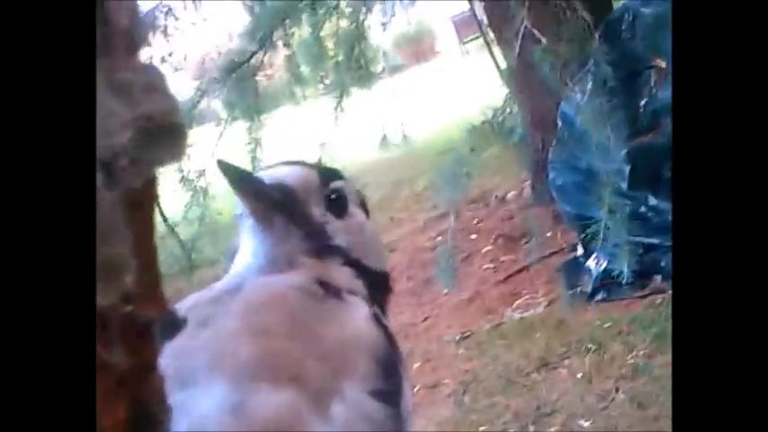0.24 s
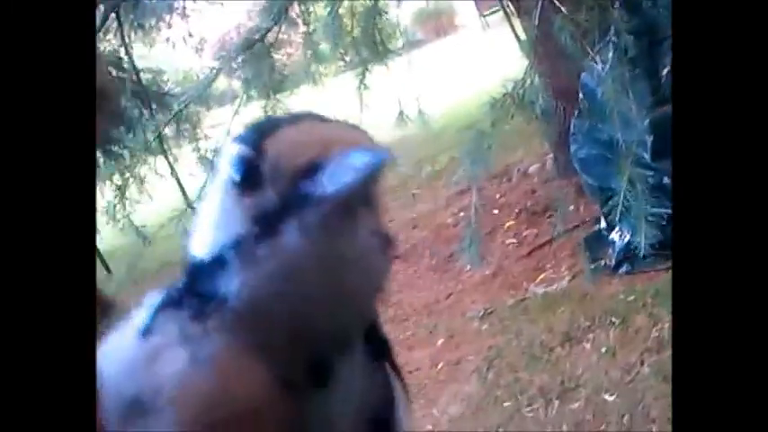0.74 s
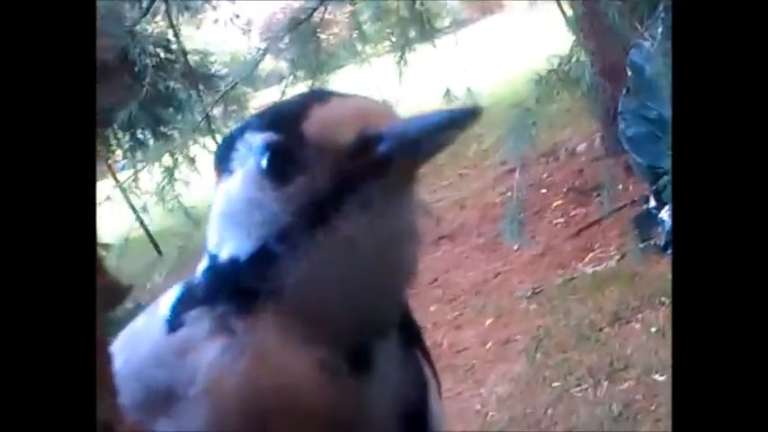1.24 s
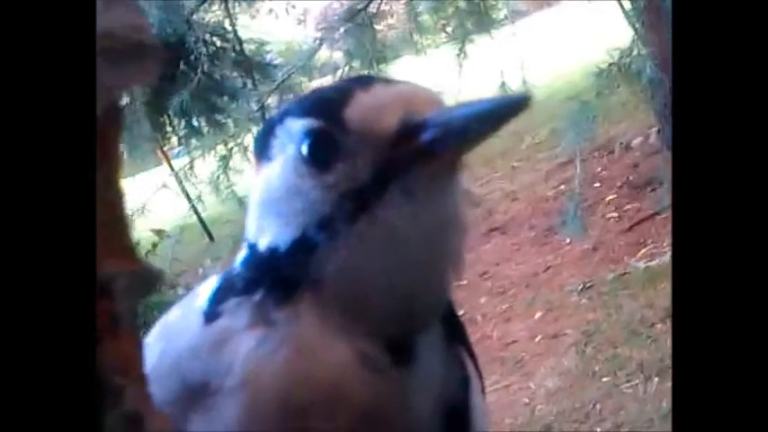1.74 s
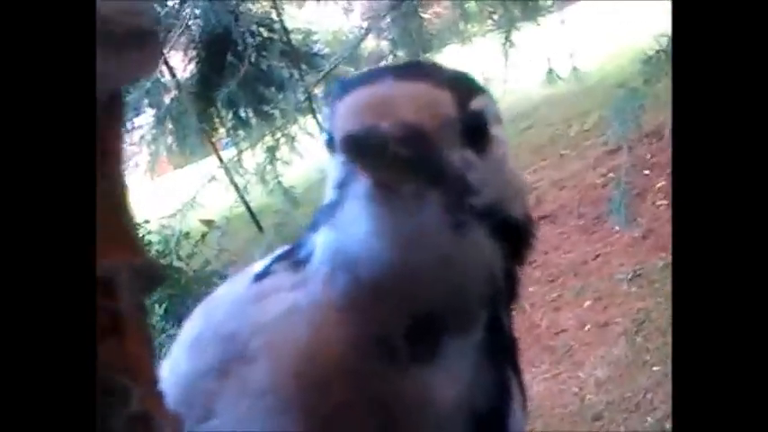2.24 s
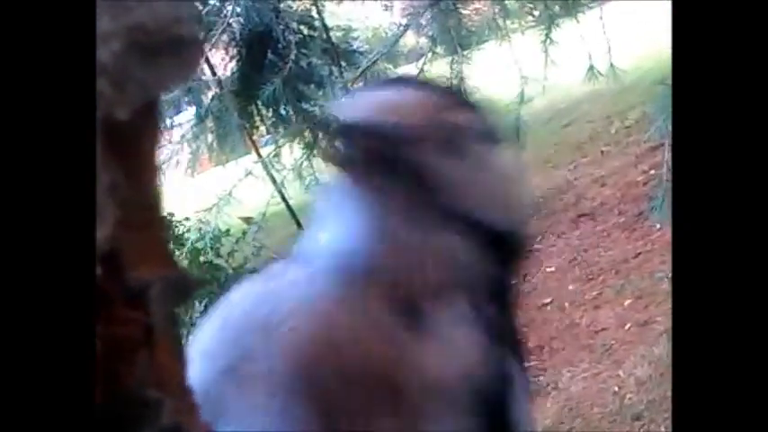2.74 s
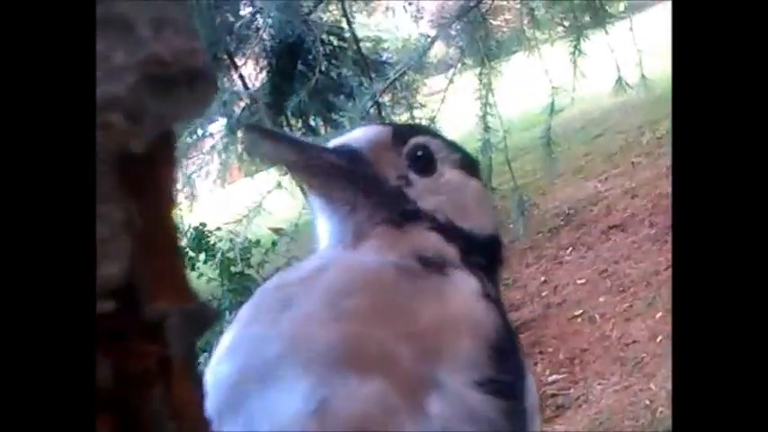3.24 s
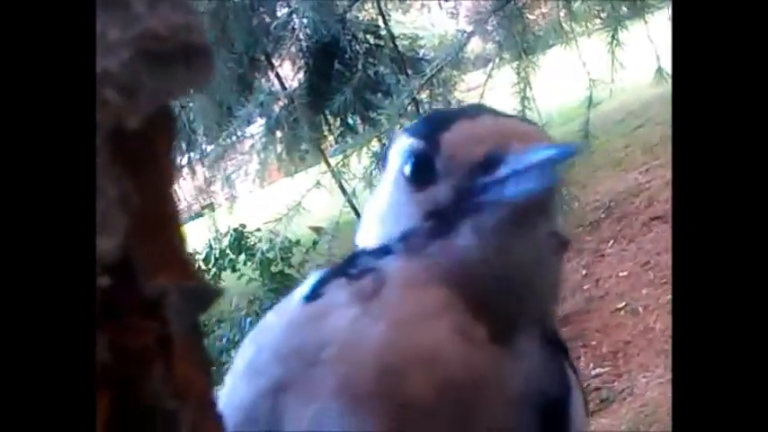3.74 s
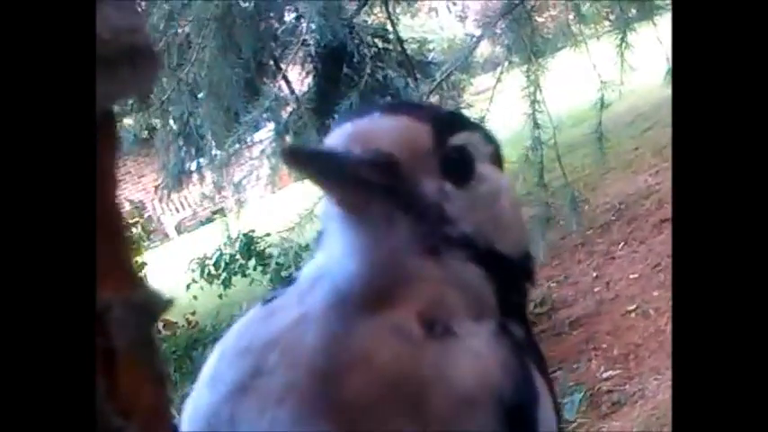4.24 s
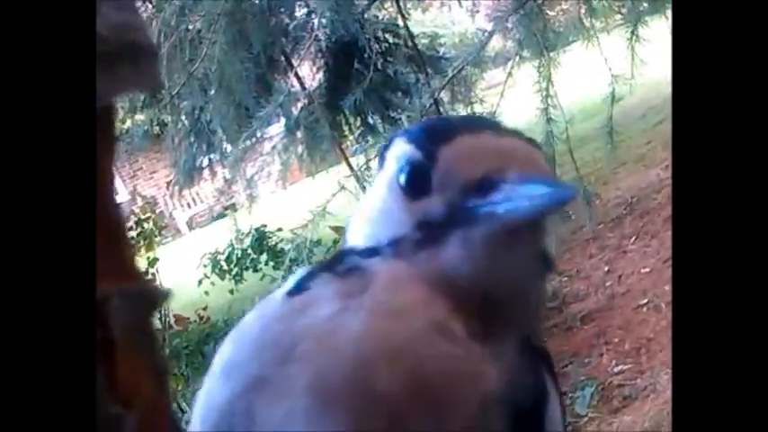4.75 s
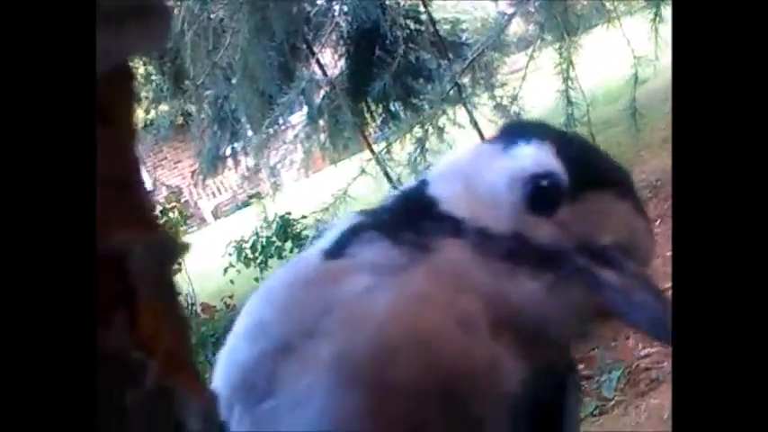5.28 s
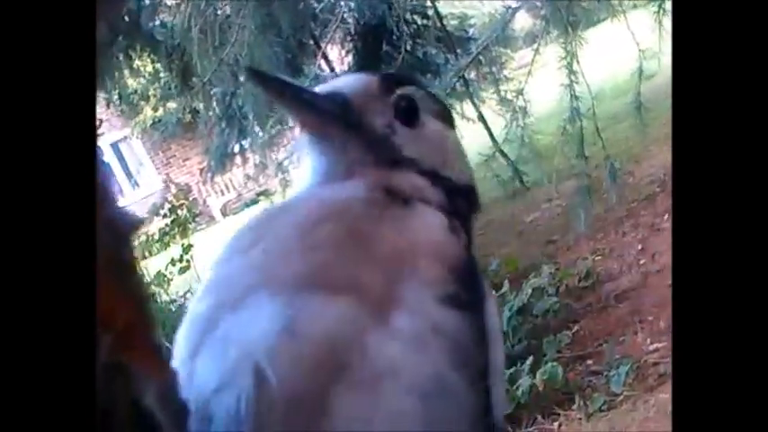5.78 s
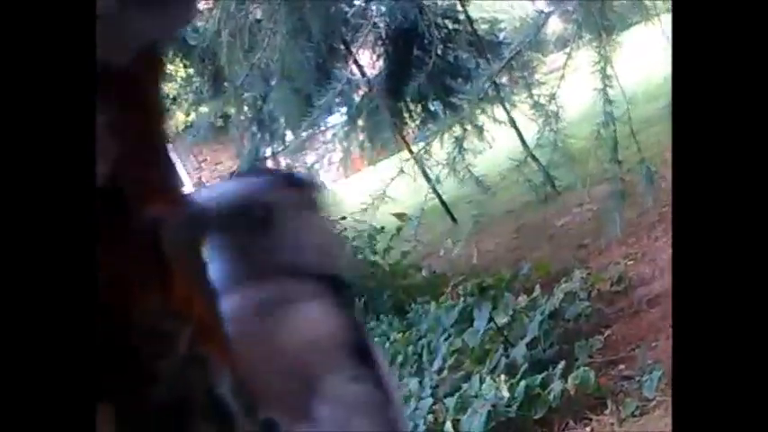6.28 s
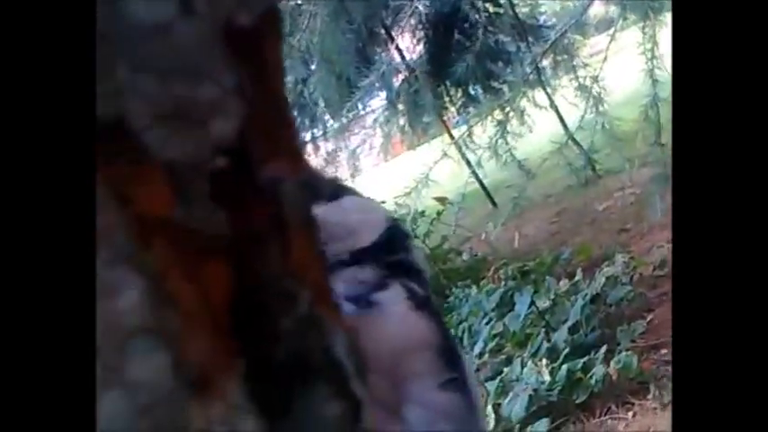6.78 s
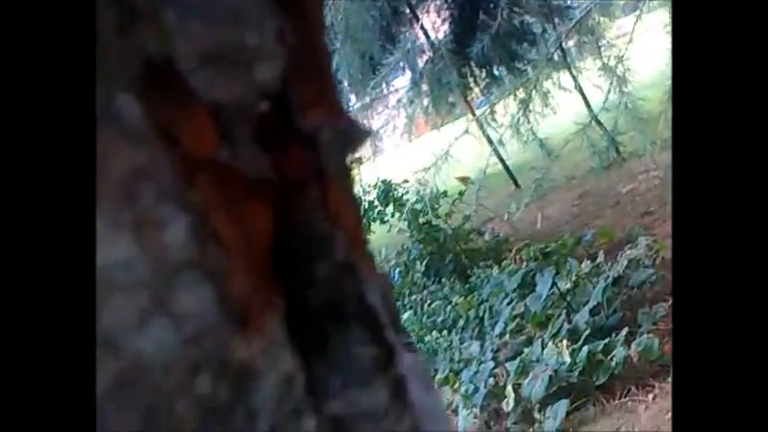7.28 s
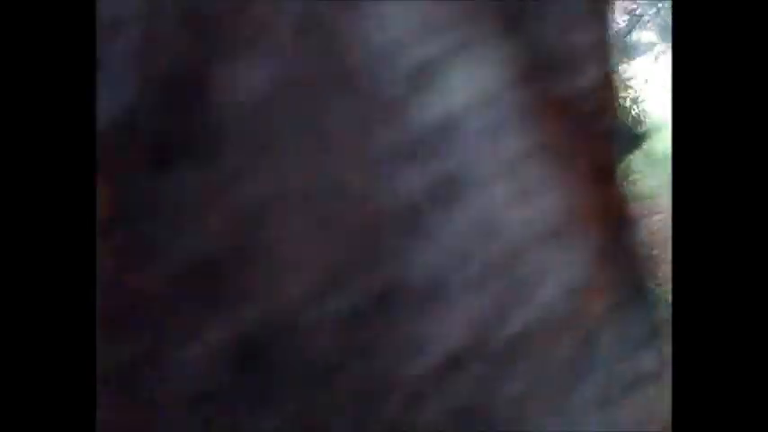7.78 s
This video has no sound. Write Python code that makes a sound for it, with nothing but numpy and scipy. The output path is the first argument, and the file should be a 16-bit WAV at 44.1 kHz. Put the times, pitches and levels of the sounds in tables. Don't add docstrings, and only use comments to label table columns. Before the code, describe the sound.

A woodpecker calls extremely close to a small microphone beside a tree trunk. Each call is a sharp, clipped chip of about a twentieth of a second: a low start jumps to a whistled arch near 2.4 kHz and drops back, with a rough, squeaky edge. Calls fall at about 0.4, 1.3, 2.1, 2.7, 3.2, 3.8, 4.4, 5.0, 5.5, 5.9, 6.4, 6.8, 7.3 and 7.8 s, brightest around 3.8-5.5 s and somewhat weaker toward the end. Dry claw ticks on bark begin at 5.9 s, cluster at 6.25-6.45 s, and return once at 7.9 s. Behind, road traffic is faint at first, swells strongly from 1 to 3.4 s, then stays steady: rumble, tyre roar, wavering engine hums, a heavier vehicle around 4.5 s and a brief hiss lift at 4.7 s. Outdoors, almost no echo, slightly grainy, rolled-off treble.

```python
import sys
import numpy as np
from scipy import signal
from scipy.fft import rfft, irfft
from scipy.io import wavfile
from scipy.ndimage import uniform_filter1d

SR = 44100
rng = np.random.default_rng(int(sys.argv[2]) if len(sys.argv) > 2 else 0)


def makeup_ratio(level_db):
    decades = np.asarray(level_db, float) / 20
    return 10 ** decades


def wrap_up_sound(samples):
    columns = np.atleast_2d(samples).T
    tamed = np.clip(columns, -1, 1)
    steps = np.round(tamed * 32767).astype(np.int16)
    wavfile.write(sys.argv[1], SR, steps)


N = 353682
CALL_START_MS, CALL_END_MS = -22.5, 33


def evened(x):
    return x / np.sqrt(np.mean(x ** 2) + 1e-20)


def read(points, hz):
    point_hz, value = np.transpose(points)
    return np.interp(np.log(hz + 1), np.log(point_hz + 1), value)


def add(mix, start_s, sound):
    part = mix[max(round(start_s * SR), 0):][:len(sound)]
    part += sound[:len(part)]


def step(t, at, span):
    return 0.5 + 0.5 * np.tanh((t - at) / (2 * span))


def bump(t, at, span):
    return np.exp(-((t - at) / span) ** 2)


def wander(length, hz, count=N):
    lowpass = signal.butter(N=2, Wn=hz, fs=SR, output="sos")
    slow = signal.sosfilt(lowpass, rng.standard_normal(count))
    return evened(slow[::-1][:length])


def noise(spectrum, patchy_db, size=1024):
    frames, hz = 4 * N // size + 8, np.fft.rfftfreq(size, 1 / SR)
    real, imaginary, patches = rng.standard_normal((frames, len(hz), 3)).T
    patches = uniform_filter1d(patches, size=10, axis=0)
    patches = evened(uniform_filter1d(patches, size=12, axis=1))
    z = (real + 1j * imaginary) * makeup_ratio(read(spectrum, hz)[:, None] + patchy_db * patches)
    return evened(signal.istft(z, nperseg=size, noverlap=3 * size // 4)[1][:N])


def pitch_share(t):
    rising = 0.32 + 0.012 * (t - CALL_START_MS)
    falling = 0.3 + 0.012 * (CALL_END_MS - t)
    low = np.where(t < 0, rising, falling)
    crown = 1 - ((t + 0.95) / 33) ** 2
    high = step(t, -9.5, 1.15) - step(t, 12.9, 1.05)
    return low + high * (crown - low)


def call_effort(t):
    attack_db = -31 * np.exp((CALL_START_MS - t) / 1.7)
    release_db = -1.5 * np.maximum(t - 18.2, 0)
    swell_db = -0.05 * np.minimum(t + 9.5, 0)
    catch_db = -2.5 * bump(t, -7.5, 0.92) + 1.5 * bump(t, 11.54, 0.92)
    return attack_db + release_db + swell_db + catch_db


def beak_opening(t):
    return step(t, -7.5, 0.42) - step(t, 11.54, 0.58)


def harshness(t):
    return -9 + 7.5 * bump(t, -9.5, 4.5) + 14 * bump(t, 12.9, 2.3)


SHUT_BEAK = [-3, -14.5, -18.5, -18.5, -20, -24, -23.5, -27, -27, -29.5, -35.5, -22]
# centre_hz, width_hz, gain_db
THROAT = [(1220, 57, -10.5), (2020, 150, -9.5), (3550, 350, 2), (4150, 190, -8.5), (6500, 670, 3.5),
          (9350, 1900, -2.5)]
# start_s, end_s
HEAD_AWAY = [(3.1, 3.4), (5.8, 6.6)]


def call(row, jitter=0.018, breath_db=-31):
    centre_s, top_hz, level_db, second_db, third_db = row
    t = np.arange(CALL_START_MS, CALL_END_MS, 1000 / SR)
    beak, harsh_db = beak_opening(t), harshness(t)
    unsteady = jitter * (1.1 - beak) * wander(len(t), 860, count=6000)
    hz = top_hz * pitch_share(t) * (1 + unsteady)
    turns = np.cumsum(hz) / SR
    open_beak = [0, second_db, third_db] + [third_db - 32 * k for k in range(1, 10)]
    flank_db = 0.5 - 0.57 * centre_s
    facing_db = 0.31 * (second_db + third_db + 25) / 2
    dull_db = -0.6 * (second_db + 8.5)
    shade_db = -18 * any(start < centre_s < end for start, end in HEAD_AWAY)
    voice = np.zeros(len(t))
    for k in range(1, 13):
        if k == 1:
            tilt_db = flank_db
        else:
            tilt_db = harsh_db + dull_db + (facing_db - dull_db) * step(k * hz, 3700, 200)
        shut_db = SHUT_BEAK[k - 1] + tilt_db
        throat_db = sum(db * bump(k * hz, centre_hz, width_hz) for centre_hz, width_hz, db in THROAT)
        throat_db = throat_db + shade_db * step(k * hz, 7760, 150)
        gain = makeup_ratio(beak * open_beak[k - 1] + (1 - beak) * shut_db + throat_db) * (k * hz < 14000)
        voice += gain * np.sqrt(2) * np.sin(2 * np.pi * (k * turns + rng.random()))
    air = np.diff(rng.standard_normal(6000))[:len(t)]
    breath = air * makeup_ratio(breath_db + harsh_db + facing_db + shade_db / 2) * (1.15 - beak)
    shimmer_db = 1.9 * (1 - beak) * wander(len(t), 200, count=6000)
    loudness = makeup_ratio(level_db + call_effort(t) + shimmer_db) * signal.windows.tukey(len(t), 0.05)
    return centre_s + CALL_START_MS / 1000, loudness * (voice + breath)


# centre_s, top_pitch_hz, level_db, second_overtone_db, third_overtone_db
CALLS = [(0.416, 2427, -18.5, -15, -24.5), (1.262, 2347, -17, -11, -19), (2.0606, 2404, -15, -9.5, -20),
         (2.727, 2365, -16, -11.5, -21), (3.249, 2464, -18, -11, -25), (3.757, 2470, -15, -2.5, -13),
         (4.4335, 2475, -14.5, -9.5, -18), (4.967, 2455, -15.5, -2, -10),
         (5.5221, 2350, -15.5, -4.5, -14.5), (5.922, 2483, -16.5, -8.5, -13.5),
         (6.4416, 2448, -20.5, -8.5, -13.5), (6.8486, 2563, -18, -5, -11), (7.3234, 2548, -19, -6.5, -11.5),
         (7.833, 2477, -22, -8.5, -12.5)]


def woodpecker():
    calls = np.zeros(N)
    for row in CALLS:
        add(calls, *call(row))
    t = np.arange(6000) / SR
    echoes = rng.choice([-1., 1.], len(t)) * (rng.random(len(t)) < 0.05)
    scatter = echoes * makeup_ratio(-60 * t / 0.077) * (t > 0.0015)
    scatter = scatter / np.linalg.norm(scatter)
    return calls + makeup_ratio(-15.5) * signal.oaconvolve(calls, scatter)[:N]


# start_s, peak_db, centre_hz
CLAW_TICKS = [(5.912, -28, 9240), (6.002, -37.5, 6800), (6.04, -40.5, 6500), (6.253, -45, 6960),
              (6.2616, -29.5, 6750), (6.2623, -34, 4220), (6.272, -42, 7500), (6.283, -52, 6950),
              (6.305, -42, 9100), (6.325, -26, 10430), (6.327, -35, 6600), (6.345, -27, 9100),
              (6.347, -50, 6500), (6.376, -29.5, 10100), (6.43, -38, 9900), (7.9143, -27.5, 7950)]


def claws():
    out, t = np.zeros(N), np.arange(900) / SR
    for start_s, peak_db, centre_hz in CLAW_TICKS:
        decay = makeup_ratio(-60 * t / 0.0022) + makeup_ratio(-15 - 60 * t / 0.047)
        scratch = rng.standard_normal(len(t)) * decay
        edges_hz = [0.84 * centre_hz, 1.18 * centre_hz]
        band = signal.butter(N=3, Wn=edges_hz, btype="band", fs=SR, output="sos")
        tick = signal.sosfilt(band, scratch)
        add(out, start_s, makeup_ratio(peak_db) * tick / abs(tick).max())
    return out


# time_s, level_db
NEARNESS = [(0.0, -39.5), (0.91, -39), (2.75, -30.5), (2.86, -29.5), (3.15, -28.5), (3.39, -27),
            (3.55, -28), (4.42, -28), (4.71, -28), (5.23, -28), (5.5, -27.5), (5.87, -28), (7.24, -27),
            (7.64, -26.5), (8.02, -28)]
# frequency_hz, level_db (per Hz)
RUMBLE_SPECTRUM = [(10, -32), (18, -8.5), (30, -2), (45, 2.5), (97, -2.5), (124, -5), (150, -14.5),
                   (220, -18.5), (300, -46)]
# frequency_hz, level_db (per Hz)
BODY_SPECTRUM = [(76, -32.5), (130, -4.5), (200, -8.5), (306, -9), (455, -5.5), (560, -7.5), (680, -15),
                 (1000, -82.5)]
# frequency_hz, level_db (per Hz)
ROAR_SPECTRUM = [(330, -41.5), (560, -14), (614, -8), (773, -2), (967, 0.5), (1230, -5), (1310, -7.5),
                 (2700, -26.5), (3510, -57.5), (5940, -120)]
# frequency_hz, level_db (per Hz)
HISS_SPECTRUM = [(2200, -25.5), (2700, -4), (3050, 0.5), (3500, -2.5), (4410, -5), (5300, -10),
                 (6500, -16.5), (11000, -39)]
# time_s, lift_db
CLOSE_CARS = [(3.4, 2.1), (4.7, 6.5), (7.55, 2.5)]


def road():
    t = np.arange(N) / SR
    near_db = np.interp(t, *np.transpose(NEARNESS)) + 28
    lorry_db = 5 * bump(t, 4.5, 1.34)
    cars_db = sum(db * bump(t, time_s, 0.25) for time_s, db in CLOSE_CARS)
    rumble = makeup_ratio(-35 + 0.45 * near_db) * noise(RUMBLE_SPECTRUM, 1.3, size=4096)
    body = makeup_ratio(-38.5 + 0.63 * near_db + lorry_db) * noise(BODY_SPECTRUM, 1.3, size=2048)
    roar = makeup_ratio(-26.5 + 1.113 * near_db) * noise(ROAR_SPECTRUM, 1.1)
    hiss = makeup_ratio(-54.5 + 1.5 * near_db + cars_db) * noise(HISS_SPECTRUM, 1.5)
    return rumble + body + roar + hiss


def engine(row, orders, waver_db=1.4, fade_s=0.1):
    start_s, end_s, first_hz, last_hz, level_db = row
    t, out = np.arange(start_s, end_s, 1 / SR), np.zeros(N)
    hz = np.linspace(first_hz, last_hz, len(t)) * (1 + 0.0037 * wander(len(t), 7))
    turns = np.cumsum(hz) / SR
    tones = np.zeros(len(t))
    for multiple, order_db in orders:
        gain = makeup_ratio(order_db + waver_db * wander(len(t), 6.5))
        tones += gain * np.sin(2 * np.pi * (multiple * turns + rng.random()))
    fade = np.clip(np.minimum(t - start_s, end_s - t) / fade_s, 0, 1)
    add(out, start_s, np.sqrt(2) * makeup_ratio(level_db) * tones * fade)
    return out


# start_s, end_s, first_hz, last_hz, level_db; the first five rows,
# near 700 Hz, are the first vehicle's whine at three times its rate
ENGINE_TONES = [(0.049, 0.6, 686, 700, -49), (0.98, 1.25, 716, 720, -43), (1.3, 1.803, 724, 720, -42.5),
                (1.969, 2.22, 739, 741, -42), (2.26, 3.14, 745, 758, -42.5), (2.7, 3.81, 269, 279.5, -41.5),
                (3.799, 4.5, 276, 283, -42), (4.494, 5.797, 275, 276.2, -39.5),
                (4.719, 6.36, 114.5, 116, -40), (6.24, 6.898, 116.6, 85.7, -39.5),
                (6.5, 6.962, 200.6, 180.6, -42), (6.88, 7.8, 181.6, 169, -44.5),
                (4.999, 6.45, 69.75, 72.5, -41), (6.517, 6.73, 70.6, 70.5, -36),
                (6.8, 8.203, 71.3, 74.5, -37), (6.82, 8.207, 133, 125.6, -45),
                (3.401, 3.862, 49.8, 53.4, -43), (3.899, 5.06, 52.6, 41.5, -43.5),
                (5.097, 5.762, 49.2, 52, -46)]
# multiple, level_db
ONE_ORDER = [(1, 0)]
# start_s, end_s, first_hz, last_hz, level_db
FIRST_VEHICLE = [
    (0, 1.277, 235, 243.1, -51.5),
    (1.25, 2.1, 242.6, 247.3, -54),
]
# multiple, level_db
FIRST_VEHICLE_ORDERS = [(.5, 5), (1, 1.5), (1.5, -4.5), (2, -3)]


def engines():
    plain = sum(engine(row, ONE_ORDER) for row in ENGINE_TONES)
    return plain + sum(engine(row, FIRST_VEHICLE_ORDERS) for row in FIRST_VEHICLE)


def scene():
    return (woodpecker() + claws() + road() + engines())[None]


# frequency_hz, level_db
MIC_HISS = [(2000, -5), (4000, -3), (5800, -6), (7200, 4.5), (9000, -0.5), (11000, 7)]
# frequency_hz, gain_db
MIC_RESPONSE = [(20, 0.5), (7500, -1), (8500, -1.5), (9700, -7), (10300, -15), (10800, -25), (12000, -76.5)]


def microphone(x):
    hz = np.fft.rfftfreq(N, 1 / SR)
    x = x + makeup_ratio(-79.5) * noise(MIC_HISS, 1.1)
    return irfft(rfft(x) * makeup_ratio(read(MIC_RESPONSE, hz)), N)


# frequency_hz, level_db
GRAIN = [(2000, -18.5), (4500, -24), (6000, -11.5), (10000, -9.5)]
TREBLE_EDGES = [2000, 2400, 2800, 3300, 3800, 4300, 4800, 5300, 5900, 6600, 7600, 8500, 9200, 10000, 11000,
                22100]


def patchy_treble(x, keep_db=-37.5, fickle_db=2.0, size=2048):
    window = np.sin(np.pi * (np.arange(size) + 0.5) / size)
    hz, _, z = signal.stft(x, SR, window, size, size // 2)
    haze = rng.standard_normal(z.shape) + 1j * rng.standard_normal(z.shape)
    haze = haze * makeup_ratio(read(GRAIN, hz) - 4.5)[:, None]
    power = abs(z) ** 2
    roar_power = power[(hz > 600) & (hz < 1400)].mean(0)
    roar_db = uniform_filter1d(10 * np.log10(roar_power + 1e-20), size=21)
    drift_db = fickle_db * rng.standard_normal(len(roar_db))
    for low_hz, high_hz in zip(TREBLE_EDGES, TREBLE_EDGES[1:]):
        band = (hz >= low_hz) & (hz < high_hz)
        level = np.sqrt(power[band].mean(0))
        drift_db = 0.8 * drift_db + 0.68 * fickle_db * rng.standard_normal(len(level))
        kept = level > makeup_ratio(roar_db + keep_db + drift_db - 2.5 * (high_hz < 5000))
        z[band] = (z[band] + level * haze[band]) * kept
    return signal.istft(z, SR, window, size, size // 2)[1][:N]


def roll_off(x):
    return signal.sosfilt(signal.butter(12, 10820, fs=SR, output="sos"), x)


def record(dry):
    mix = patchy_treble(microphone(dry[0]))[None]
    return roll_off(mix)


dry = scene()
out = record(dry)
wrap_up_sound(out)
```